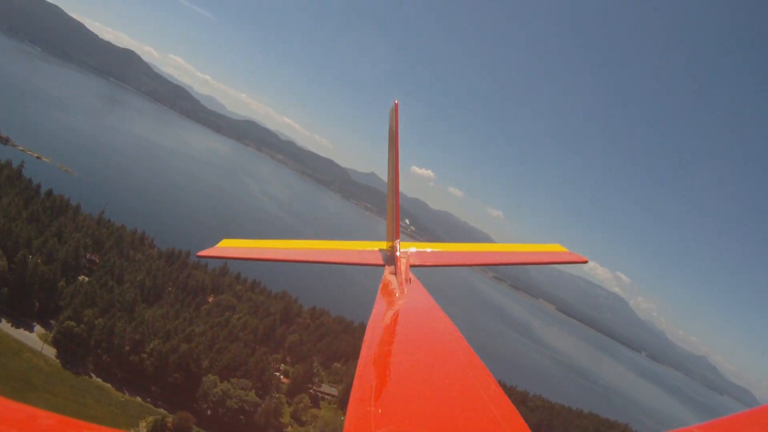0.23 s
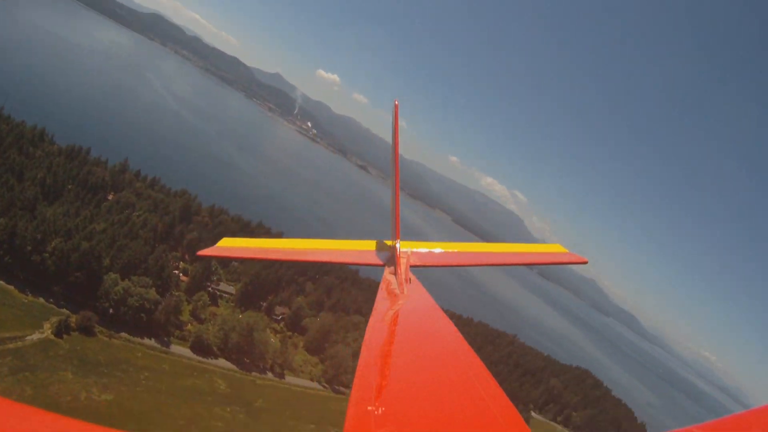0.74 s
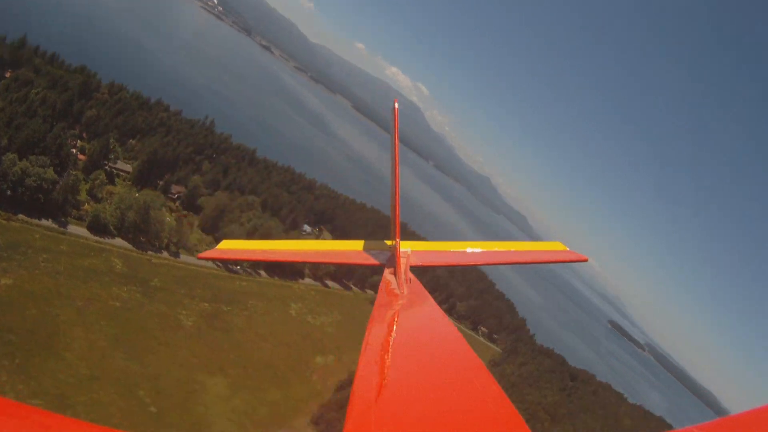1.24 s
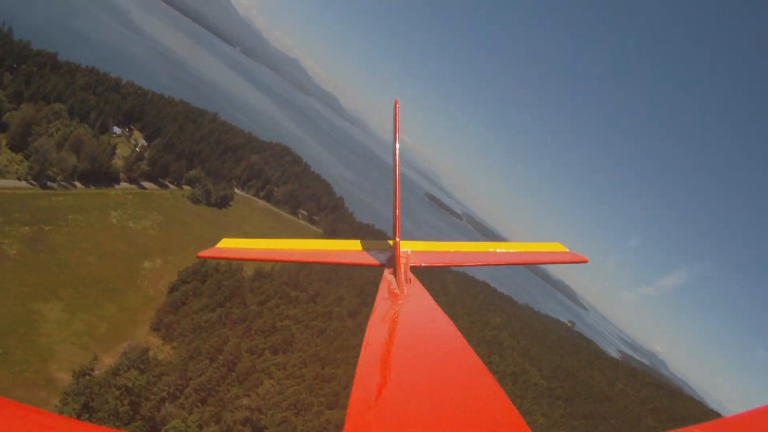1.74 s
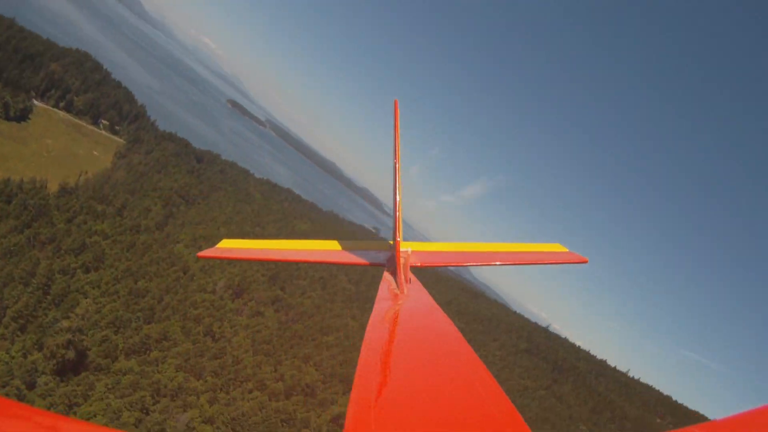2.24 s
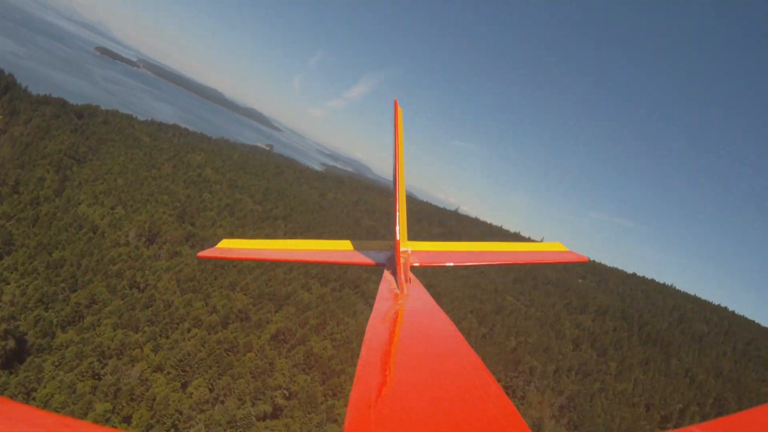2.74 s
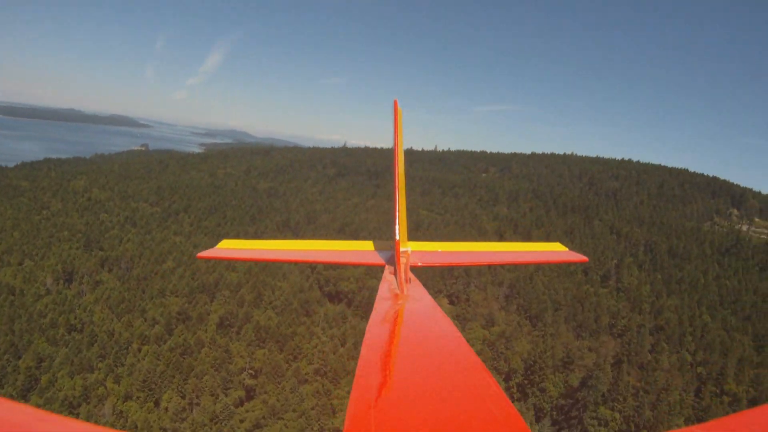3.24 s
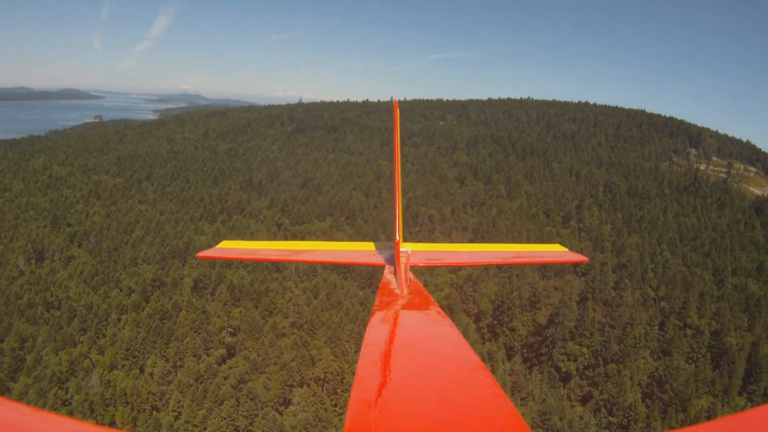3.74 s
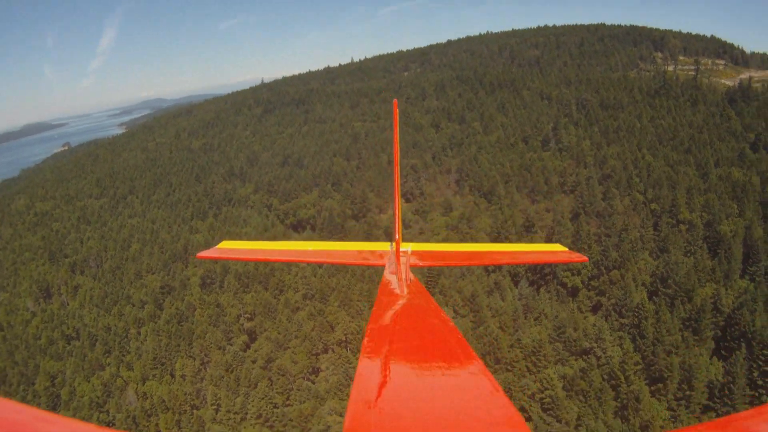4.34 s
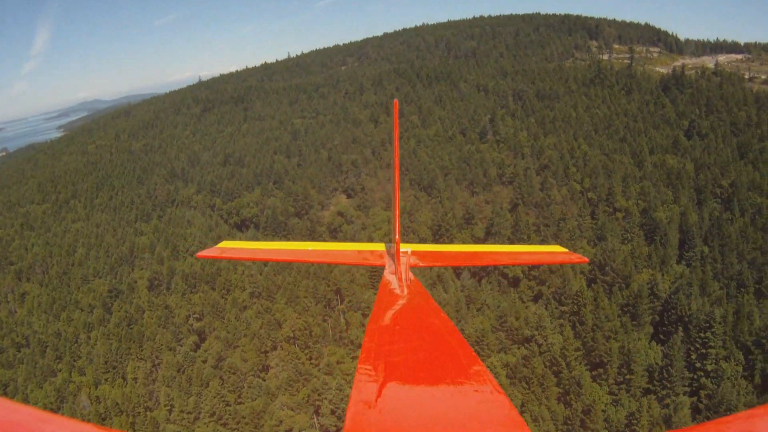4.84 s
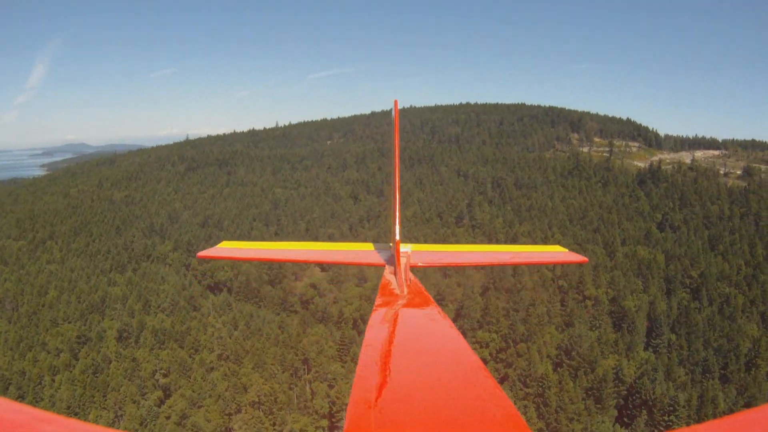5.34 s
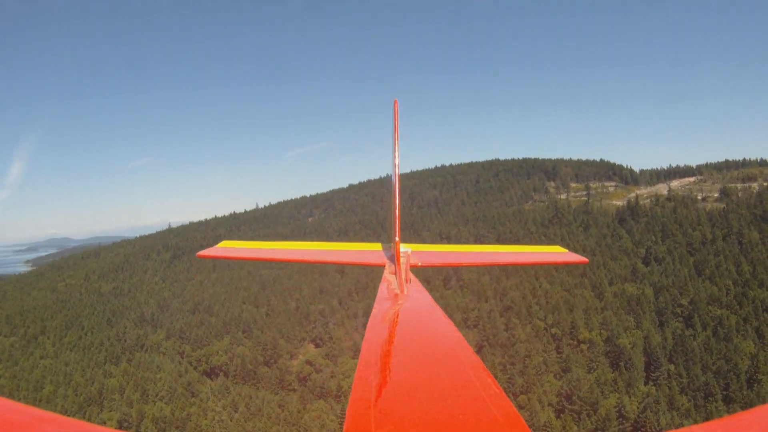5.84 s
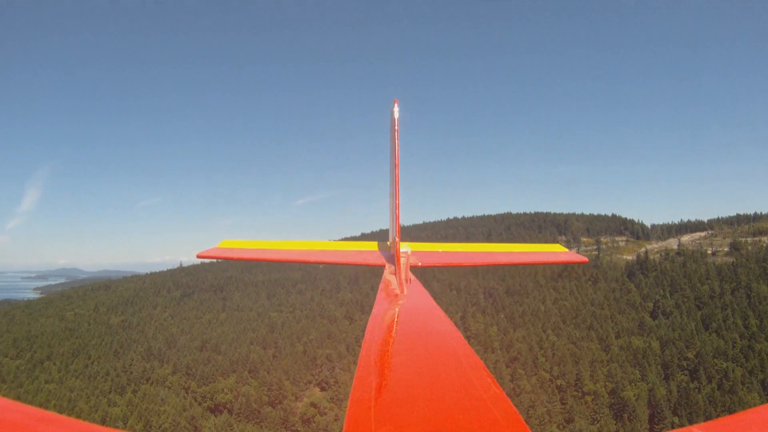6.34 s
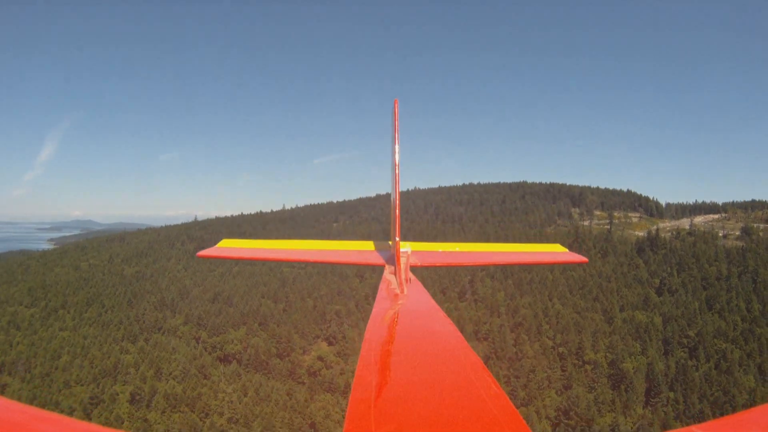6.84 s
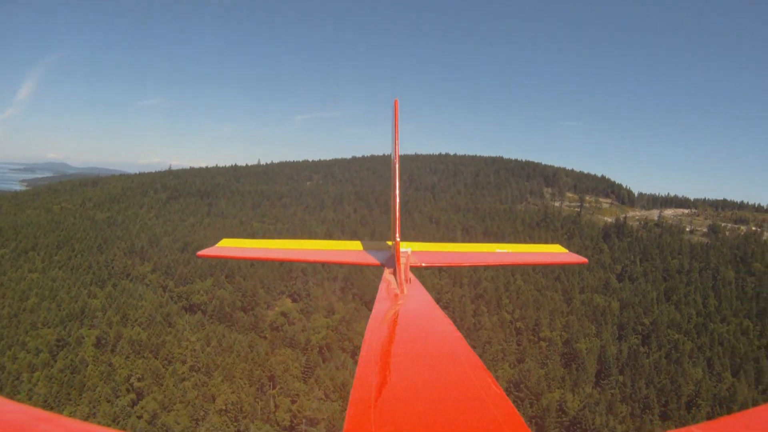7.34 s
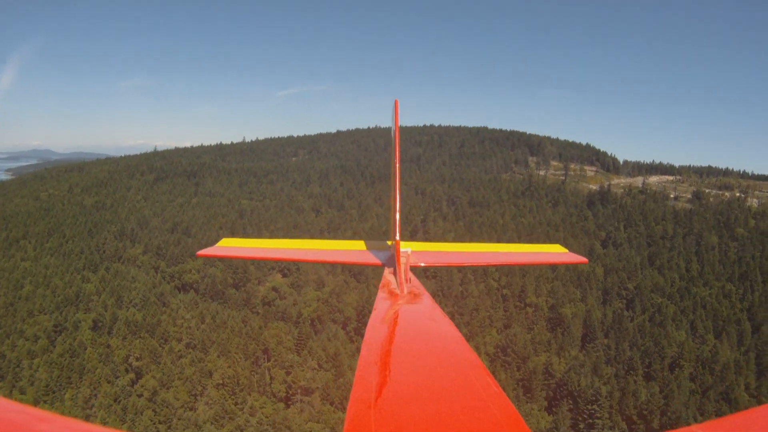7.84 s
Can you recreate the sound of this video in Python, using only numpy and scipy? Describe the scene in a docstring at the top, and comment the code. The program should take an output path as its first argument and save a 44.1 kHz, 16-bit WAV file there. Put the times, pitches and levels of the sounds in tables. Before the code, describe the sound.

Outdoors, on the back of a small model aircraft in flight, a microphone inside a loose plastic housing catches rapid buzzing taps, bursts of dense chatter and scattered single knocks. Low wind thumps in gusts over a soft rush, with faint motor hum and a nasal airframe drone. It eases around five to six seconds, then rattles up again. Everything is close, dry and slightly fizzy.

```python
"""Open air, on the back of a model aircraft in flight: a small camera with its microphone in the wind.
Wind is shaped noise: low thumps in gusts over a softer rush. The motor hums faintly as sine harmonics.
The airframe drones as resonant noise plus one motor harmonic. The main voice is the camera housing:
impacts through resonators tap once per motor turn, knock singly, or work loose into dense chatter.
The recorder holds each sample, which adds a glassy fizz; faint dry ticks dot the treble."""
import sys
import numpy as np
from scipy import signal
from scipy.fft import rfft, irfft
from scipy.io import wavfile
from scipy.ndimage import uniform_filter1d

SR = 44100
rng = np.random.default_rng(int(sys.argv[2]) if len(sys.argv) > 2 else 0)


def output_pcm(signal):
    """Save a mono or channel-first signal as 16-bit PCM at the path in sys.argv[1].

    Samples are clipped to [-1, 1] before scaling.
    """
    pcm = np.clip(np.atleast_2d(signal).T, -1, 1) * 32767
    wavfile.write(sys.argv[1], SR, np.round(pcm).astype(np.int16))


N = 356769
TIME = np.arange(N) / SR  # s
TURN_HZ = 70.18  # mean turn rate of the motor


def from_db(db):
    """Decibels to gain."""
    return 10 ** (np.asarray(db) / 20)


def rms_one(x):
    """Scale to rms 1."""
    return x / np.sqrt(np.mean(x ** 2) + 1e-20)


def butter(x, hz, kind, order=2):
    """Causal Butterworth filter."""
    sections = signal.butter(order, hz, kind, fs=SR, output="sos")
    return signal.sosfilt(sections, x + 1e-18)


def drift(per_s):
    """Smooth random wander of spread 1; a higher per_s (Hz) wanders faster."""
    white = rfft(rng.standard_normal(N))
    hz = np.fft.rfftfreq(N, 1 / SR)
    return rms_one(irfft(white / (1 + (hz / per_s) ** 2), N))


def noise(spectrum):
    """Noise of a given colour, rms 1."""
    hz, db = np.transpose(spectrum)
    log_hz = np.log(np.fft.rfftfreq(N, 1 / SR) + 1)
    gain = from_db(np.interp(log_hz, np.log(hz), db))
    return rms_one(irfft(rfft(rng.standard_normal(N)) * gain, N))


def clicks(times, sizes):
    """Single-sample impacts."""
    at = np.clip(times * SR, 0, N - 1).astype(int)
    return np.bincount(at, sizes, N)


def die_away(impacts, decay_s):
    """Each impact becomes an exponential tail that falls by a factor e in decay_s."""
    return signal.lfilter([1], [1, -np.exp(-1 / (decay_s * SR))], impacts + 1e-18)


def curve(rows):
    """A table of (time, value) joined by straight lines."""
    return np.interp(TIME, *np.transpose(rows))


def humps(rows):
    """Each (middle, length, height) row rises and falls as one smooth hump."""
    total = 0
    for middle, length, height in rows:
        phase = np.pi * np.clip((TIME - middle) / length, -.5, .5)
        total = total + height * np.cos(phase) ** 2
    return total


def held(start, length, attack_s, release_s):
    """Exponential attack ahead of the start, a hold at 1, exponential release after the end."""
    out = np.zeros(N)
    span = [start - 10 * attack_s, start + length + 10 * release_s]
    near = slice(*np.searchsorted(TIME, span))
    since_start = TIME[near] - start
    attack = np.minimum(since_start, 0) / attack_s
    release = np.maximum(since_start - length, 0) / release_s
    out[near] = np.exp(attack - release)
    return out


# faint dry ticks in the treble: [t/s, level/dB before the trim and band filter]
TICKS = [(.1027, -52), (.154, -48), (.168, -50), (.4688, -46), (0.5934, -44), (.9532, -45), (.988, -52),
         (1.0111, -48), (1.0224, -44), (1.045, -50), (1.2067, -50), (1.2391, -59), (1.257, -51),
         (1.265, -41), (1.2895, -46), (3.3687, -57), (3.404, -54), (4.266, -41)]


def ticks(low_hz=4600, high_hz=7400, tick_db=1, tick_t60=0.0084):
    """Tiny bright crackles above the rattle: band-passed noise that dies 60 dB in tick_t60 seconds."""
    times, level_db = np.transpose(TICKS)
    impacts = clicks(times, from_db(level_db + tick_db))
    dying = die_away(impacts, tick_t60 / np.log(1000))
    return butter(dying * rng.standard_normal(N), [low_hz, high_hz], "band", order=3)


# motor hum: [multiple of the turn rate, rms level/dB before its waver]
HUM = [(1, -53), (5, -74.5)]


def motor(waver_db=3, speed_spread=0.0047):
    """Faint harmonics of the motor come through the airframe, wavering as its speed drifts slightly."""
    turn_hz = TURN_HZ * (1 + speed_spread * drift(8.8))
    angle = 2 * np.pi * np.cumsum(turn_hz) / SR
    hum = 0
    for multiple, db in HUM:
        level = np.sqrt(2) * from_db(db + waver_db * drift(22.0))
        hum = hum + level * np.sin(round(multiple) * angle)
    return hum


# speed of the air over the fuselage, as the relative loudness of its rush: [t/s, level/dB]
AIRFLOW = [(0, -49.5), (.45, -50), (1.1, -49.5), (1.9, -49), (2.4, -52), (3.15, -49), (3.55, -52.5),
           (4.45, -50), (4.9, -54.5), (5.3, -58.5), (6.1, -57.5), (7.25, -51), (8.09, -53)]
# colour of the eddies' thumping, before it is evened out: [f/Hz, relative level/dB per Hz]
RUMBLE = [(15, -40), (30, -12.5), (42, -7.5), (54, 3), (68, 2.5), (80, -0.5), (97, -6.5), (118, -14),
          (138, -27.5), (192, -27), (220, -33.5), (400, -67)]
# colour of the air rush, before its two bands are swung: [f/Hz, relative level/dB per Hz]
RUSH = [(90, -30), (140, -2.5), (195, 2.5), (220, -4.5), (300, -10.5), (440, -15.5), (720, -15.5),
        (920, -9), (1050, -9.5), (1200, -11.5), (1500, -18.5), (2300, -23.5), (3000, -31), (5500, -73)]
# gusts that hit the microphone port: [middle t/s, length/s, rumble gain/dB]
GUSTS = [(.35, 0.17, 5), (.61, 0.087, 5), (.74, 0.21, 4.5), (1.54, 0.24, 7), (1.76, 0.15, 4.5),
         (2.08, 0.062, 8.5), (2.9, 0.12, 9.5), (3.1, 0.21, 5), (3.26, 0.44, 5.5), (4.7, 0.23, 3),
         (5.73, 0.25, 7), (6.17, 0.18, 9), (6.57, 0.16, 5), (7.2, 0.43, 2)]
# pockets of calm air: [middle t/s, length/s, rumble loss/dB]
CALMS = [(.89, 0.19, 6), (2.2, 0.6, 3.5), (3.45, 0.074, 11), (5.0, 0.1, 8), (5.42, 0.72, 3),
         (7.56, 0.22, 5.5)]
# rumble at mean airflow, and the share of the airflow's swing that it follows
RUMBLE_DB, RUMBLE_FOLLOWS = -36, 0.98
# the rush splits at this pitch; each band follows its own share of the airflow's swing
RUSH_SPLIT_HZ, LOW_RUSH_FOLLOWS, HIGH_RUSH_FOLLOWS = 294, 1.07, 0.88


def wind(evenness=0.89, rush_db=-1.5, flutter_db=2.2):
    """Eddies thump on the port, swelling in gusts, over a softer rush; both follow the airflow."""
    flow_db = curve(AIRFLOW)
    swing_db = flow_db - flow_db.mean()
    # dividing by the local strength evens out the thumps
    eddies = noise(RUMBLE)
    strength = np.sqrt(uniform_filter1d(eddies ** 2, SR // 12))
    rumble_db = RUMBLE_DB + RUMBLE_FOLLOWS * swing_db + humps(GUSTS) - humps(CALMS)
    rumble = rms_one(eddies / strength ** evenness) * from_db(rumble_db)
    low = butter(noise(RUSH), RUSH_SPLIT_HZ, "low") * from_db(LOW_RUSH_FOLLOWS * swing_db)
    high = butter(noise(RUSH), RUSH_SPLIT_HZ, "high") * from_db(HIGH_RUSH_FOLLOWS * swing_db)
    rush_level = from_db(flow_db.mean() + rush_db + flutter_db * drift(35))
    return rumble + (low + high) * rush_level


# resonances of the airframe: [f/Hz, width/Hz, relative level/dB]
AIRFRAME = [(916, 59, -0.5), (1170, 74, -7)]


def drone(ring, free, tone=0.5, drone_db=-2.5, airflow_db=-3, waver_db=0.5):
    """Turbulence and a motor harmonic on its main resonance ring the airframe; bursts make it swell."""
    stirred = 0
    for hz, width, db in AIRFRAME:
        resonator = signal.iirpeak(hz, hz / width, SR)
        mode = signal.lfilter(*resonator, rng.standard_normal(N))
        stirred = stirred + from_db(db) * rms_one(mode)
    harmonic = np.sqrt(2) * np.sin(2 * np.pi * 13 * TURN_HZ * TIME + drift(6))
    steady = from_db(curve(AIRFLOW) + airflow_db + waver_db * drift(3.2)) * free
    return rms_one(stirred + tone * harmonic) * np.hypot(steady, ring) * from_db(drone_db)


# resonances of the plastic housing: [f/Hz, width/Hz, level/dB before the contact low-pass, polarity]
HOUSING = [(959.6, 38, -8, 1), (1168, 171, -12, 1), (1958, 233, -2.5, 1), (2329, 127.6, 5, -1),
           (2770, 136, -7.5, 1), (3290, 68, -15.5, -1), (3540, 120, -7, 1), (3793, 128, -3, -1),
           (5380, 570, -22, 1)]


def housing(force, contact_hz=2060):
    """Soft plastic contacts ring the housing's resonances; the softness rolls off the treble."""
    out = 0
    for hz, width, db, polarity in HOUSING:
        r = np.exp(-np.pi * width / SR)
        poles = [1, -2 * r * np.cos(2 * np.pi * hz / SR), r * r]
        gain = np.sign(polarity) * from_db(db) * (1 - r * r) / 2
        out = out + gain * signal.lfilter([1, 0, -1], poles, force + 1e-18)
    return butter(out, contact_hz, "low")


def taps(shake, jitter_s=.00035, sway_s=.0007, uneven_db=2.5, bounce=0.8, bounce_s=0.000927,
         tap_db=0.5, low_hz=1200, play_db=-63):
    """Each motor turn the housing taps its mount and bounces twice; swings smaller than its play miss."""
    turns = np.arange(.0118, N / SR, 1 / TURN_HZ)  # from the first tap, s
    at = (turns * SR).astype(int)
    early, size, *rebounds = rng.standard_normal((len(turns), 4)).T
    times = turns + jitter_s * early + sway_s * drift(3.3)[at]
    swing = shake[at] * from_db(tap_db + uneven_db * size)
    sizes = np.maximum(swing - from_db(play_db), 0)
    force = clicks(times, sizes)
    for rebound in rebounds:
        times = times + bounce_s * np.exp(rebound / 2)
        sizes = bounce * sizes
        force = force + clicks(times, sizes)
    # such small blows barely move the low modes
    return butter(force * np.sqrt(SR / TURN_HZ / 2), low_hz, "high", order=1)


# single knocks of the housing, from faint to hard: [t/s, level/dB before the trim and softening]
KNOCKS = [(0.624, -31), (0.6952, -25.5), (0.7753, -29), (.8101, -25), (1.094, -23.5), (1.3856, -29),
          (1.737, -22.5), (2.463, -25.5), (2.6473, -27.5), (2.703, -28), (2.8329, -29), (2.876, -28),
          (2.942, -28.5), (3.1069, -28), (3.673, -35), (4.401, -22.5), (4.8303, -25.5), (5.059, -29),
          (5.1295, -30), (5.156, -28), (5.229, -43), (5.2686, -40), (5.3394, -45), (5.4259, -27),
          (5.6157, -30.5), (5.722, -29.5), (6.294, -47), (6.3948, -25), (6.425, -24.5), (6.4379, -20.5),
          (6.7313, -29.5), (6.8211, -25.5), (7.181, -33.5), (7.6066, -24.5)]


def knocks(knock_db=2, judder=0.041, judder_t60=0.041):
    """Each knock leaves the housing juddering: noise that dies 60 dB in judder_t60 seconds."""
    times, level_db = np.transpose(KNOCKS)
    blows = clicks(times, from_db(level_db + knock_db))
    dying = die_away(blows, judder_t60 / np.log(1000))
    return blows + judder * dying * rng.standard_normal(N)


# the housing sits tight and falls quiet: [start t/s, length/s, loss/dB]
SEATED = [(.37, 0.049, 10.5), (1.47, 0.2, 6), (3.165, 0.1, 4), (3.915, 0.017, 5), (4.013, 0.072, 16),
          (4.365, 0.021, 8), (4.55, 0.028, 13), (5.24, 0.13, 16), (6.02, 0.036, 41), (6.191, 0.15, 22),
          (7.345, 0.018, 7), (7.505, 0.0098, 20)]
# before each knock the housing lifts off its mount
LIFT_S, LIFT_LOSS_DB = .012, 3.5


def grip(close_s=0.0037, open_s=0.0042):
    """Gain of taps, chatter and steady drone: drops while the housing sits tight or lifts for a knock."""
    lifts = [(time - LIFT_S, LIFT_S, LIFT_LOSS_DB) for time, _ in KNOCKS]
    total_loss_db = 0
    for start, length, loss_db in list(SEATED) + lifts:
        total_loss_db = total_loss_db + loss_db * held(start, length, close_s, open_s)
    return from_db(-total_loss_db)


# the housing works loose and chatters:
# [start t/s, length/s, chatter level/dB before grip, airframe ring level/dB before the drone trim]
BURSTS = [(0, 0.071, -40, -48), (0.174, .13, -41, -60), (0.444, 0.08, -48, -62), (0.649, 0.066, -43.5, -55),
          (0.85, 0.039, -39.5, -44), (0.905, 0.066, -50, -50), (1.097, 0.049, -43.5, -47),
          (1.283, 0.022, -46, -56), (1.734, 0.071, -43.5, -50), (2.049, 0.097, -40.5, -49),
          (2.189, 0.1, -45, -69), (2.315, 0.096, -46, -53.5), (2.49, .11, -43, -48.5),
          (2.863, 0.23, -65, -51), (3.572, 0.052, -47.5, -48.5), (3.696, 0.065, -39.5, -45),
          (3.766, 0.12, -42.5, -63), (4.106, 0.13, -47, -49.5), (4.407, 0.086, -47, -55),
          (4.645, 0.19, -49.5, -58), (4.845, 0.092, -38, -41), (5.037, .05, -50, -51.5),
          (5.439, 0.1, -49, -52.5), (5.643, 0.052, -56, -50), (6.411, 0.13, -37, -49.5),
          (6.633, 0.036, -50, -54), (6.766, 0.03, -49, -49), (6.857, 0.055, -45.5, -51),
          (7.419, 0.13, -44.5, -73), (7.51, 0.16, -49, -60)]


def looseness(swell_s=0.017, settle_s=0.015):
    """Strength of the chatter, and of the airframe's ring, as each burst swells and settles."""
    shapes = np.array([held(start, length, swell_s, settle_s) for start, length, _, _ in BURSTS])
    levels = from_db(np.array(BURSTS)[:, 2:].T)
    return np.sqrt(levels ** 2 @ shapes ** 2)


def chatter(strength, per_s=2400, uneven_db=2.5, chatter_db=0, jolts_per_s=90, settle_s=0.0056, steady=2.2):
    """Floating free, the housing hits both sides of its play; each jolt starts a flurry that settles."""
    touches = rng.random(N) < per_s / SR
    unevenness = from_db(uneven_db * np.clip(rng.standard_normal(N), -2, 2))
    sides = rng.choice([-1, 1], N)
    jolts = rng.random(N) < jolts_per_s / SR
    flurry = die_away(jolts, settle_s)
    hits = touches * unevenness * sides * (steady + flurry)
    return rms_one(hits) * strength * from_db(chatter_db)


# how hard the motor shakes the housing: [t/s, relative tap level/dB]
SHAKE = [(0, -45.5), (.7, -46), (1.4, -48.5), (1.95, -50), (2.65, -44.5), (3.2, -50), (3.38, -48),
         (3.9, -48.5), (4.7, -48), (5.07, -48.5), (5.22, -53), (5.6, -51), (6.2, -50), (6.85, -48),
         (7.15, -49), (7.6, -49), (8.09, -51)]
# loose contacts between bursts: level at mean shake, and dB gained per dB of shake
IDLE_CHATTER_DB, IDLE_GROWTH = -57, 1.6


def rattle(loose, free, soft_hz=2500):
    """Taps, chatter and knocks ring one housing; taps and knocks last longer and are duller."""
    # the housing's own gain is divided out: by energy for taps and chatter, by peak for knocks
    response = housing(signal.unit_impulse(SR // 10))
    energy = np.linalg.norm(response)
    peak = np.abs(response).max()
    shake_db = curve(SHAKE)
    blows = taps(from_db(shake_db) * free) / energy + knocks() / peak
    idle = from_db(IDLE_CHATTER_DB + IDLE_GROWTH * (shake_db - shake_db.mean()))
    contacts = chatter(np.hypot(loose, idle) * free) / energy
    return housing(butter(blows, soft_hz, "low") + contacts)


def scene():
    """Wind, motor, airframe and rattle are all right at the microphone, in open air."""
    loose, ring = looseness()
    free = grip()
    mix = wind() + motor() + drone(ring, free) + rattle(loose, free)
    return mix[None]


def record(dry, hiss_db=-69, band_hz=5400, hold_hz=12000, cutoff_hz=15000):
    """The preamp hisses; holding each slow sample mirrors the sound around the hold rate; the top is cut."""
    hiss = from_db(hiss_db) * rng.standard_normal(N)
    voltage = butter(dry + hiss, band_hz, "low", order=8)
    slow = signal.resample_poly(voltage, hold_hz, SR, axis=1)
    # each slow sample lasts four fast ones
    steps = np.repeat(slow, 4, axis=1)
    stepped = signal.resample_poly(steps, SR, 4 * hold_hz, axis=1)[:, :N]
    top_cut = signal.ellip(10, .1, 80, cutoff_hz, fs=SR, output="sos")
    # the ticks join after the hold, so they are not mirrored
    return signal.sosfilt(top_cut, stepped + ticks())


dry = scene()
out = record(dry)
output_pcm(out)
```